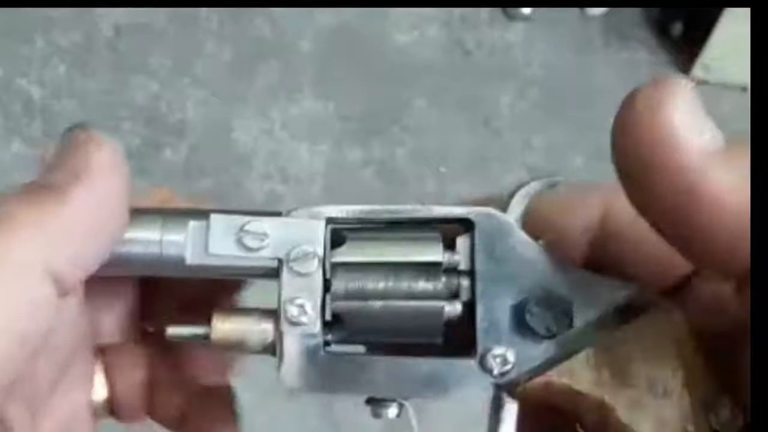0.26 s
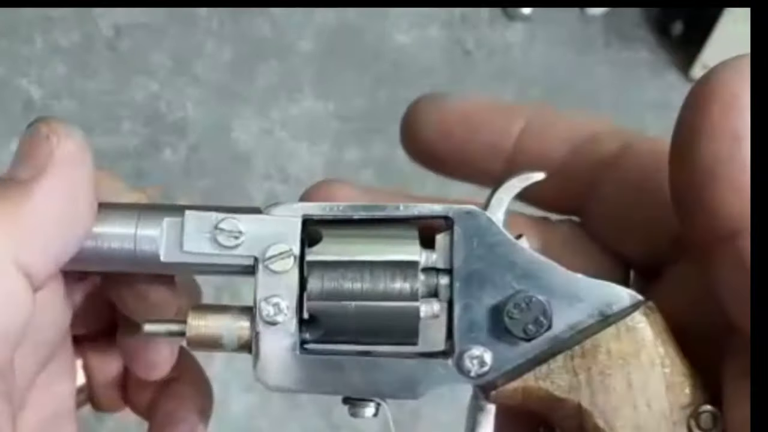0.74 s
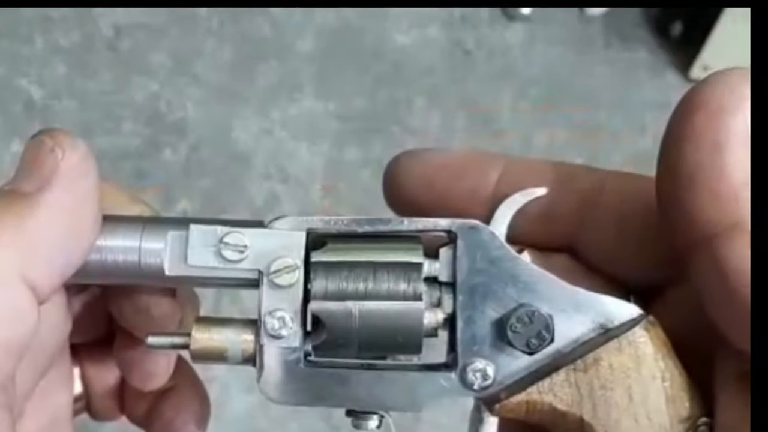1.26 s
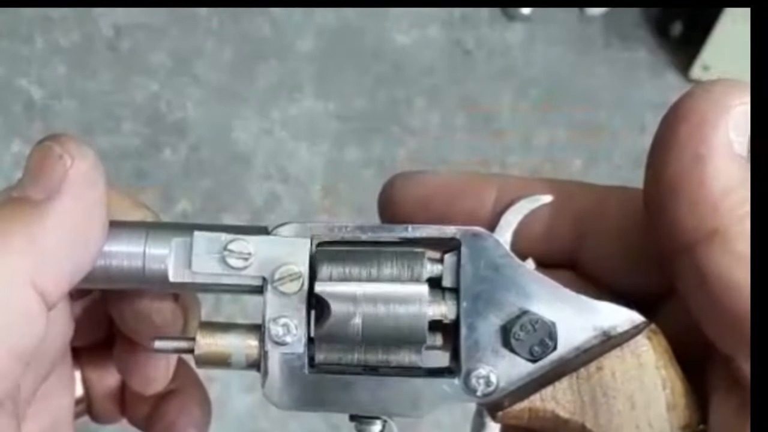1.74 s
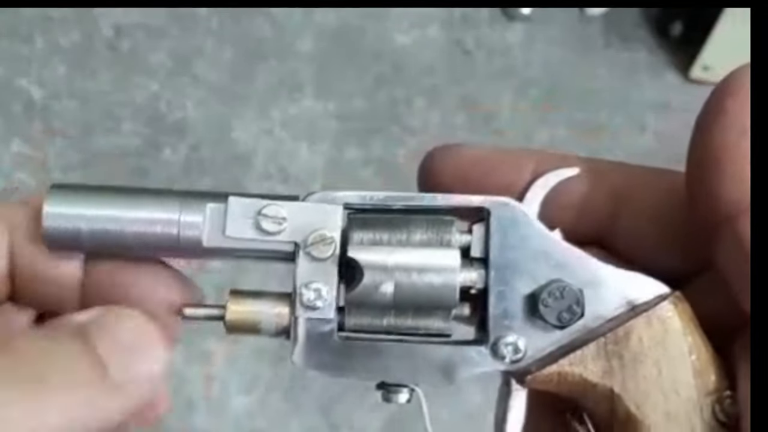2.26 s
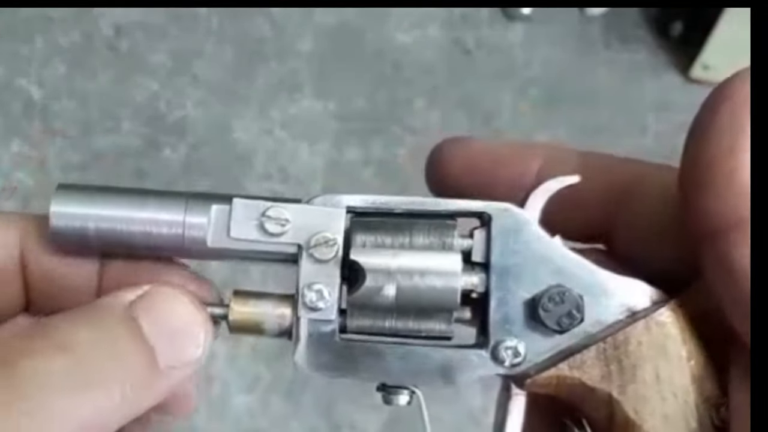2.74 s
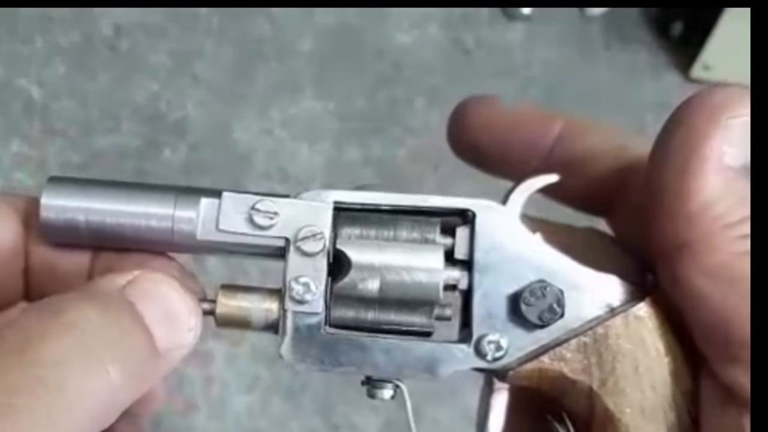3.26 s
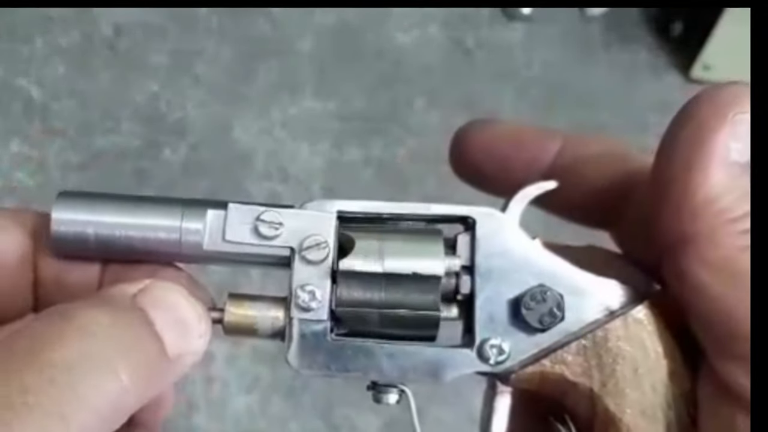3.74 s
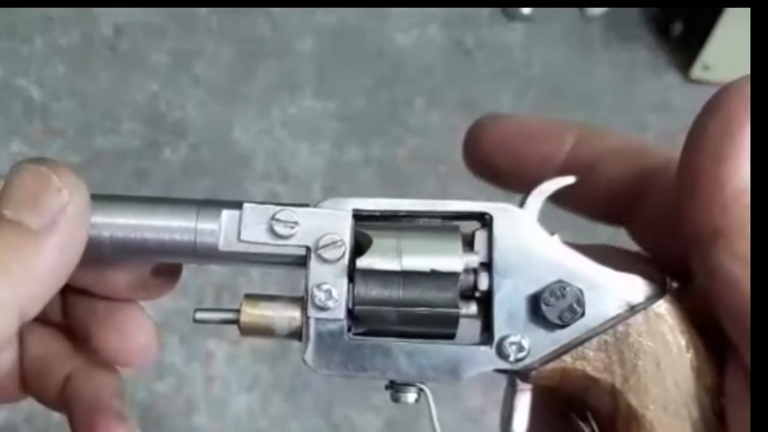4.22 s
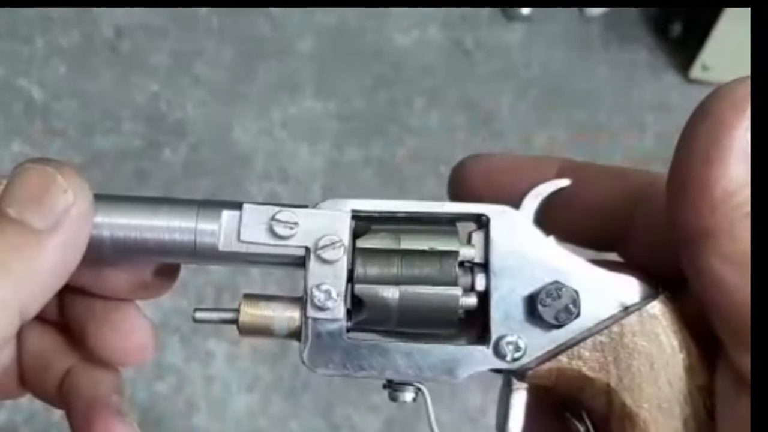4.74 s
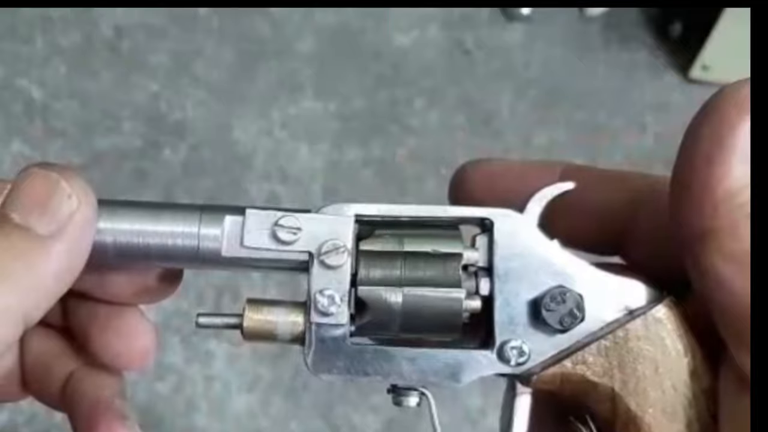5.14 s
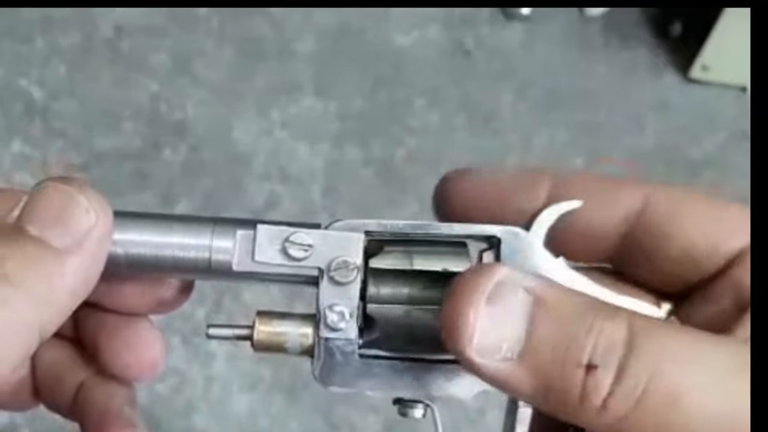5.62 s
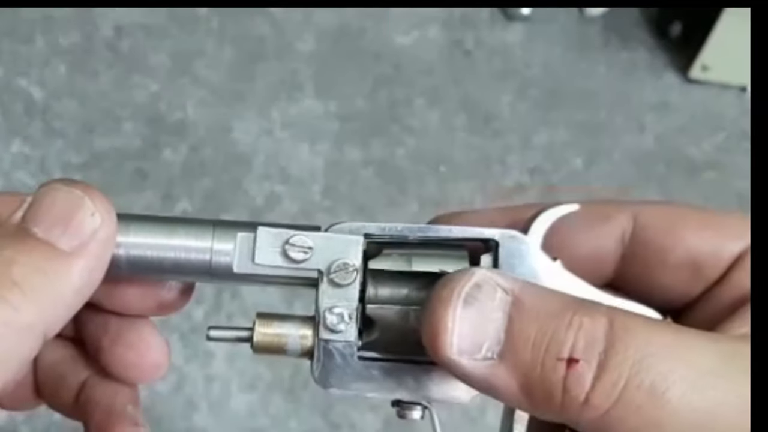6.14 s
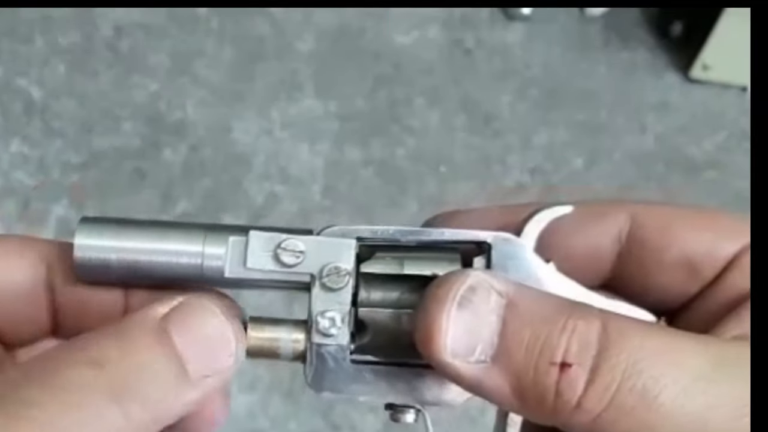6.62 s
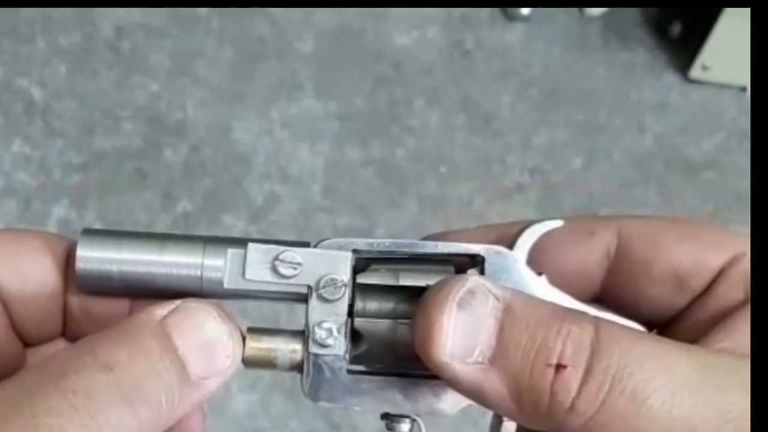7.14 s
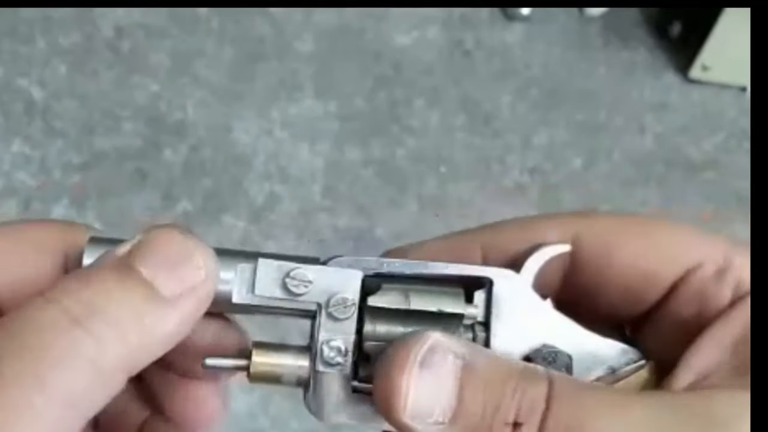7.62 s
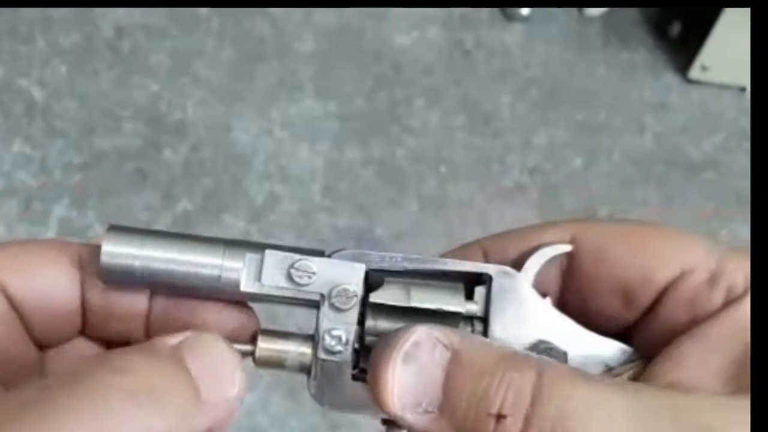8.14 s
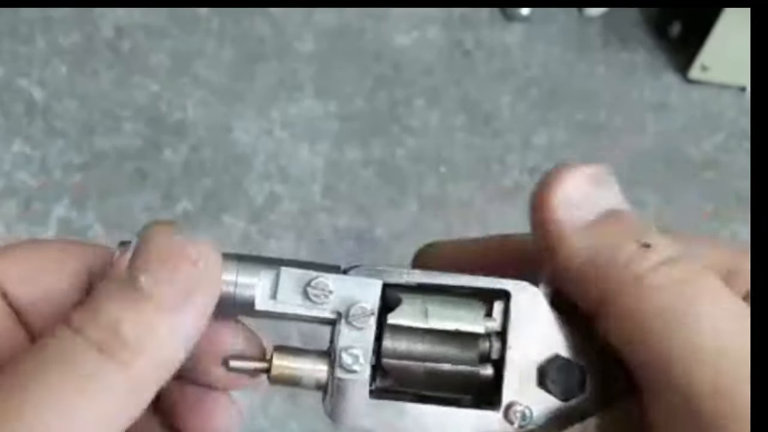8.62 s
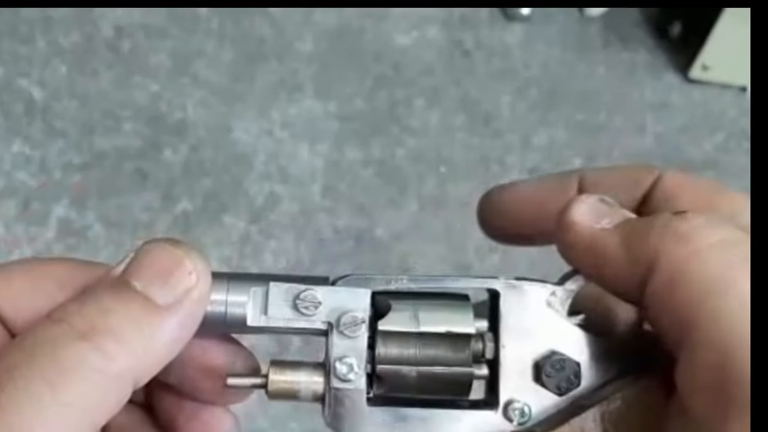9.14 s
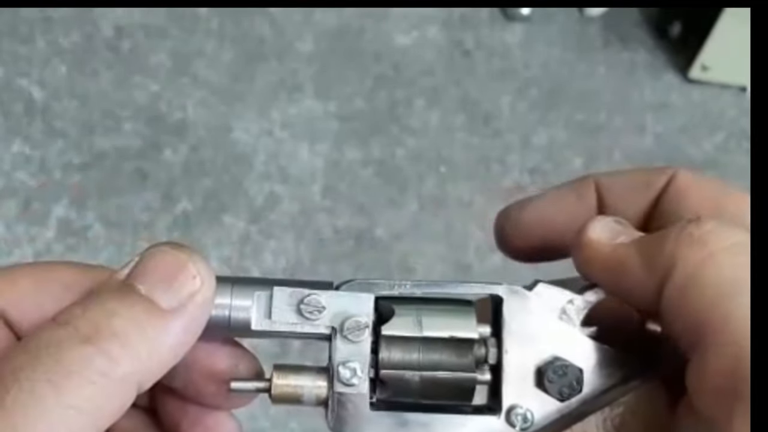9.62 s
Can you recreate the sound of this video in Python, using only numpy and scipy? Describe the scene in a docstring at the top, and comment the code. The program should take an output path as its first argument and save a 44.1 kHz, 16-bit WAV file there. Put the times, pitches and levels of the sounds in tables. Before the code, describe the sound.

Close stereo pickup of a small metal revolver handled in a dry little room with faint low hum. Fingers rub softly, the cylinder whirs briefly and is caught by a loud bright snap. Scattered clinks and ticks follow, with two hard clacks of the pin well apart, then a denser rattle of handling, and at the end a sharp hammer click.

```python
"""Small revolver worked by hand

A small steel revolver is handled close to a stereo microphone in a dead little workroom that hums faintly.
Its freed cylinder whirs and is caught with a snap, its pin clacks twice, and at last the hammer clicks back.
Uneven impacts excite clinks, knocks and ticks; damped modes ring in the snaps; filtered noise makes
the rubs, creaks, squeaks, ringing bodies, whir and hum; a wavering sine sings at the pivot.
Short reflections surround the impacts.
"""
import sys
import numpy as np
from scipy import signal
from scipy.fft import rfft, irfft, next_fast_len
from scipy.io import wavfile
from scipy.ndimage import uniform_filter1d

SR = 44100
rng = np.random.default_rng(int(sys.argv[2]) if len(sys.argv) > 2 else 0)


def generate_wav(sig):
    """Save sig (samples, or channels by samples) to the path in sys.argv[1] as 16-bit PCM at SR."""
    pcm = np.round(np.clip(np.atleast_2d(sig).T, -1, 1) * 32767).astype(np.int16)
    wavfile.write(sys.argv[1], SR, pcm)


N = 435708
SIZE = 32768   # samples in one short sound
AGE = np.arange(SIZE) / SR   # seconds into a short sound
HZ = np.maximum(np.arange(SIZE // 2 + 1) * SR / SIZE, 1)
LEFT_LEAD_S = 0.0002215   # sound reaches the left port this much earlier


def from_db(db):
    """Decibels to gain."""
    return 10 ** (np.asarray(db) / 20)


def rms_one(x):
    """Scale to unit power."""
    return x / np.sqrt(np.mean(x ** 2) + 1e-20)


def energy_one(x):
    """Scale one short sound to unit energy a channel."""
    return rms_one(x) / np.sqrt(SIZE / SR)


def in_time(points):
    """Read a (time, level) curve at every sample."""
    s, level = np.transpose(points)
    return np.interp(np.arange(N) / SR, s, level)


def at_hz(points, hz):
    """Read a spectrum on a log-frequency axis."""
    f, value = np.transpose(points)
    return np.interp(np.log(hz), np.log(f), value)


def peak_db(hz, centre_hz, width_hz):
    """A steep-sided resonance, 3.5 dB down about half a width either side of its centre."""
    detuning = (hz ** 2 - centre_hz ** 2) / (hz * width_hz * np.sqrt(2))
    return -20 * np.log10(1 + detuning ** 2)


def colour(x, db):
    """Causal (minimum-phase) filter with the given gain at HZ, for short sounds."""
    cepstrum = irfft(np.log(from_db(db)))
    # fold the cepstrum onto positive time, which makes the phase minimum
    cepstrum[1:SIZE // 2] *= 2
    cepstrum[SIZE // 2 + 1:] = 0
    return irfft(rfft(x) * np.exp(rfft(cepstrum)))


def add(out, s, sound):
    """Mix a short sound in at time s."""
    start = round(s * SR)
    out[:, start:start + SIZE] += sound[:, :N - start]


def envelope(start_s, attack_s, hold_s, release_s):
    """Rise linearly to full strength at start_s, hold, then die away exponentially."""
    age = np.arange(N) / SR - start_s
    rise = np.clip(1 + age / attack_s, 0, 1)
    return rise * np.exp(-np.maximum(age - hold_s, 0) / release_s)


def diffuse(shape_db, size):
    """Stereo noise from all around: most alike in the low range, unrelated at the top; the left leads."""
    # how alike left and right are: hz, likeness (0-1)
    likeness = [(60, 0.17), (130, 0.95), (290, 0.52), (640, 0.82), (1400, 0.14), (15000, 0)]
    length = next_fast_len(size, real=True)
    hz = np.maximum(np.arange(length // 2 + 1) * SR / length, 1)
    alike = np.clip(at_hz(likeness, hz), -1, 1)
    noise = rfft(rng.standard_normal((2, length))) * from_db(shape_db(hz))
    mid, side = noise * np.sqrt([1 + alike, 1 - alike])
    left = mid + side
    right = (mid - side) * np.exp(-2j * np.pi * hz * LEFT_LEAD_S)
    return rms_one(irfft(np.array([left, right]), length)[:, :size])


def room(build_s=.008, floor_s=.0105, floor_db=4.0):
    """Reflections: first from the hands, then more from the floor, each band dying at its own rate."""
    # decay time of the reflections: hz, t60_s
    decay = [(200, 0.32), (1000, 0.19), (4000, 0.21), (8000, 0.19), (14000, 0.17)]
    noise = rfft(diffuse(np.zeros_like, size=SIZE))
    centres = np.log(np.array(decay)[:, 0])
    tail = 0
    for (hz, t60_s), own in zip(decay, np.eye(len(decay))):
        band = np.interp(np.log(HZ), centres, own)   # crossfades into its neighbours
        tail = tail + irfft(noise * band) * from_db(-60 * AGE / t60_s)
    build = 1 - np.exp(-AGE / build_s * np.pi)
    floor = from_db(floor_db * (AGE > floor_s))
    return energy_one(tail * build * floor) / np.sqrt(SR)


def heard(sound, reflections, direct_db, room_db):
    """The straight path reaches the left port first; the reflections come from everywhere."""
    # what the left port adds to sound from straight ahead: hz, gain_db
    on_axis = [(3000, 0), (5000, 1), (7000, 2.5), (9000, 6), (12000, 4), (15000, 1)]
    left = colour(sound, at_hz(on_axis, HZ))
    right = np.interp(AGE - LEFT_LEAD_S, AGE, sound, left=0)
    reflected = irfft(rfft(sound) * rfft(reflections))
    return from_db(direct_db) * np.array([left, right]) + from_db(room_db) * reflected


def chatter(slide_s, per_s=2500, uneven_db=8.5):
    """A run of tiny uneven impacts that dies away."""
    sizes = rng.standard_normal(SIZE) * from_db(uneven_db * rng.standard_normal(SIZE))
    touches = sizes * (rng.random(SIZE) < per_s / SR)
    return energy_one(touches * np.exp(-AGE / slide_s))


def friction(spectrum, level_db, grain_db, grain_s=0.0051):
    """Sliding noise, roughened by the grain of the surfaces."""
    grain = rms_one(uniform_filter1d(rng.standard_normal(N), int(grain_s * SR)))
    noise = diffuse(lambda hz: at_hz(spectrum, hz), size=N)
    return from_db(level_db) * rms_one(noise * from_db(grain_db * grain))


def hum():
    """Two narrow bands of low noise waver like tones of the room over an even hiss."""
    # the drone swells and sinks slowly: time_s, level_db
    drone_level = [(0, -54.5), (.6, -59), (1.2, -53), (1.6, -59.5), (2.6, -56.5), (3.55, -62.5),
                   (3.9, -54.5), (4.3, -60), (5.05, -53.5), (5.2, -48.5), (5.4, -52.5), (6.8, -60.5),
                   (9.4, -66.5), (9.88, -57)]
    # spectrum of the hiss: hz, relative_db
    air = [(15, -37), (25, -14.5), (89, -3.5), (184, -0.5), (307, -12), (371, -15), (449, -8.5), (542, -19),
           (905, -16), (1680, -21), (5520, -25), (10800, -27.5), (14600, -25), (15800, -25.5)]
    drone = diffuse(lambda hz: peak_db(hz, 193.6, width_hz=6.9), size=N)
    rumble = diffuse(lambda hz: peak_db(hz, 86.5, width_hz=20), size=N)
    hiss = diffuse(lambda hz: at_hz(air, hz), size=N)
    return from_db(in_time(drone_level)) * drone + from_db(-64) * rumble + from_db(-52.5) * hiss


def rub(trim_db=-1.0):
    """Fingers rub on the gun: grainy noise that swells and sinks with the handling."""
    # strength of the rubbing: time_s, level_db (before the trim)
    strength = [(0.0, -62.5), (0.85, -65), (1.32, -60.5), (1.73, -54.5), (1.95, -56), (2.26, -60),
                (2.67, -66), (2.97, -63), (3.11, -54), (3.36, -61), (5.47, -64), (5.86, -65), (6.52, -63.5),
                (7.29, -62), (7.43, -57.5), (9.0, -61), (9.88, -59.5)]
    # spectrum of skin on steel: hz, relative_db
    skin = [(150, -19), (450, -4), (950, 0), (1600, -2), (3000, -6.5), (6000, -11.5), (9000, -15.5),
            (12000, -25)]
    return friction(skin, in_time(strength) + trim_db, grain_db=1.5)


def bumps(centre_hz=85, width_hz=22):
    """Each shift of the grip gives a short low boom of narrow-band noise."""
    # shifts of the grip: start_s (full strength), level_db
    shifts = [(.03, -47), (1.15, -49), (1.58, -51.5), (1.95, -47), (4.0, -53.5), (6.95, -58), (7.45, -65),
              (7.87, -47.5), (8.32, -49)]
    strength = 0
    for s, db in shifts:
        strength = strength + from_db(db) * envelope(s, attack_s=0.028, hold_s=0.02, release_s=0.17)
    return strength * diffuse(lambda hz: peak_db(hz, centre_hz, width_hz), size=N)


def resonant_swells(rooms):
    """Short swells of noise in one resonance: creaks, squeaks, and the ringing body of clacks and knocks."""
    # swells: start_s, length_s, energy_db, pitch_hz, width_hz
    swells = [(.805, 0.013, -67.5, 1190, 350), (1.11, 0.052, -62, 980, 70),
              (1.338, 0.02, -52.5, 5300, 1900), (1.6, 0.19, -63.5, 7400, 450),
              (2.17, 0.063, -64.5, 3240, 600), (2.31, 0.054, -65.5, 370, 200), (2.57, 0.045, -67, 308, 150),
              (3.07, 0.061, -63, 1260, 304), (3.153, 0.031, -49, 3750, 800), (3.645, 0.03, -63, 590, 403),
              (3.72, 0.011, -59.5, 1900, 500), (4.742, 0.03, -65, 726, 200),
              (4.895, 0.013, -66.5, 5800, 600), (5.146, 0.026, -54.5, 500, 189),
              (6.946, 0.023, -43.5, 4500, 1290), (6.947, .012, -58, 1320, 400),
              (7.25, 0.033, -59, 6400, 1600), (7.59, 0.034, -55, 4660, 1000),
              (7.722, 0.013, -60.5, 1080, 330), (7.86, 0.02, -62, 585, 250), (8.02, 0.021, -69, 785, 200),
              (8.175, 0.049, -50, 5800, 337), (8.75, 0.033, -67, 4540, 700), (9.17, 0.064, -75, 9000, 700)]
    out = np.zeros((2, N))
    for k, (s, length_s, db, hz, width_hz) in enumerate(swells):
        swell = np.sin(np.pi * np.minimum(AGE / length_s, 1))
        resonance_db = np.maximum(peak_db(HZ, hz, width_hz), -60)
        sound = colour(rng.standard_normal(SIZE) * swell, resonance_db)
        placed = heard(sound, rooms[k % len(rooms)], direct_db=0.5, room_db=1.5)
        add(out, s, from_db(db) * energy_one(placed))
    return out


def contacts(rooms, strike_s=0.0098, first_s=0.001):
    """Parts strike, weaker the longer they slide, then chatter: steel clinks and the frame knocks."""
    # loose parts meet: start_s, slide_s, clink_db, brightest_hz (of the clink), knock_db
    meetings = [(.8585, .002, -58, 10500, -74), (1.3378, 0.0062, -42.5, 11400, -62),
                (1.44, 0.0092, -71, 8000, -52.5), (2.14, 0.06, -55, 9000, -57.5),
                (2.259, 0.0091, -53.5, 7400, -59), (2.51, .033, -78, 7000, -56.5),
                (2.93, 0.017, -63, 7000, -51), (3.1512, 0.014, -33, 8200, -31),
                (3.4546, .005, -59, 9100, -60.5), (3.718, 0.0048, -48, 8350, -64),
                (3.8044, .006, -56, 9200, -56), (4.2459, .009, -52, 8500, -60.5),
                (4.416, 0.0057, -56, 7400, -67), (4.7442, 0.0045, -47, 7500, -62),
                (4.9009, 0.0055, -59, 7800, -68), (5.1905, .014, -42.5, 6800, -68),
                (5.76, .01, -57.5, 6000, -63), (5.9141, 0.017, -47, 11300, -63),
                (6.5102, 0.025, -53, 11500, -70), (6.8674, 0.04, -52, 7200, -62),
                (6.9458, 0.0041, -30, 7660, -68.5), (7.2455, 0.025, -52, 8000, -66),
                (7.3583, 0.025, -51.5, 8000, -61.5), (7.4895, 0.0039, -56.5, 8400, -62),
                (7.5927, 0.015, -49.5, 8050, -59), (7.86, 0.0094, -51, 7660, -46.5),
                (8.312, 0.0074, -45, 7300, -52.5), (8.4887, 0.12, -52, 8650, -63),
                (8.565, 0.0035, -53, 10000, -61), (8.6813, 0.016, -56, 8500, -66),
                (8.745, .039, -51, 9100, -79), (8.897, 0.032, -50.5, 8500, -70)]
    # resonances of the frame, heard in every contact: centre_hz, width_hz, boost_db
    frame = [(903, 300, 11.5), (1390, 190, 6.5), (2080, 230, 0), (2660, 250, -1), (3520, 160, -1.5),
             (4780, 590, 1.5), (7690, 250, 2.5)]
    # the clink slides as one shape with the hardness of the contact: multiple_of_brightest_hz, relative_db
    clink_shape = [(.12, -26), (.24, -15), (.34, -6.5), (.58, -4), (.8, -2.5), (1, -3), (1.2, -9.5),
                   (1.6, -18), (2.2, -27)]
    # the knock of the frame, damped by the hands: hz, relative_db
    knock_shape = [(40, -38), (160, 2), (230, -8.5), (320, -6), (500, -13.5), (780, -7), (2000, -2),
                   (4700, -20), (13000, -55)]
    frame_db = sum(db * np.exp(-((HZ - hz) / width) ** 2) for hz, width, db in frame)
    out = np.zeros((2, N))
    for k, (s, slide_s, clink_db, bright_hz, knock_db) in enumerate(meetings):
        strike = strike_s / slide_s * chatter(first_s, per_s=22000)
        force = energy_one(chatter(slide_s) + strike)
        clink = colour(force, clink_db + at_hz(clink_shape, HZ / bright_hz) + frame_db)
        knock = colour(force, knock_db + at_hz(knock_shape, HZ) + frame_db)
        # the shielding hands weaken the straight path
        add(out, s, heard(clink, rooms[k % len(rooms)], direct_db=-16.0, room_db=-4.0))
        add(out, s, heard(knock, rooms[(k + 1) % len(rooms)], direct_db=-6.5, room_db=0.5))
    return out


def ticks(rooms, width_hz=1300):
    """The pawl touches its ratchet: very short bursts in one resonance, nearly dry."""
    # touches of the pawl: start_s, energy_db (before placing), pitch_hz
    touches = [(.8585, -70, 5760), (1.4397, -65, 5460), (2.5966, -71.5, 5370), (2.7792, -73, 4100),
               (3.5943, -73.5, 5530), (4.2459, -87, 7450), (4.2668, -75, 6760), (6.6369, -70, 5200),
               (6.8055, -75, 5030), (6.8674, -69, 5960), (7.2455, -65, 4900), (7.3583, -70, 6900),
               (7.5925, -63, 4600), (7.6776, -65.5, 4580), (8.7227, -70.5, 7550), (9.4745, -76, 6500)]
    out = np.zeros((2, N))
    for k, (s, db, hz) in enumerate(touches):
        burst = chatter(0.0021, per_s=7300)
        sound = energy_one(colour(burst, peak_db(HZ, hz, width_hz)))
        add(out, s, from_db(db) * heard(sound, rooms[k % len(rooms)], direct_db=-1.5, room_db=-7.5))
    return out


def spin(start_s=1.366, hold_s=0.46, start_db=-55, swell_db_per_s=18.5):
    """The freed cylinder whirs on its pin, growing louder, and fades after it is caught."""
    # spectrum of the whir: hz, relative_db
    whir = [(300, -16), (1000, 7.5), (2100, -6), (2900, 3.5), (3600, 5), (4400, -1), (5100, 2.5),
            (6600, -5), (7400, 2), (7850, 5), (8400, -2), (9300, -6), (11000, -23), (16000, -17)]
    swell_db = swell_db_per_s * np.clip(np.arange(N) / SR - start_s, 0, hold_s)
    noise = friction(whir, start_db + swell_db, grain_db=-2.5)
    return noise * envelope(start_s, attack_s=0.036, hold_s=hold_s, release_s=0.091)


def snap(s, level_db, modes, reflections, direct_db, room_db, crack_db, crack_hz):
    """A spring drives a catch home: damped modes start in turn up and down, under a like-coloured crack."""
    ring = 0
    for k, (hz, db, t60_s) in enumerate(modes):
        strength = (-1) ** k * from_db(db + rng.standard_normal())
        ring = ring + strength * from_db(-60 * AGE / t60_s) * np.sin(2 * np.pi * hz * AGE)
    bass_cut_db = np.maximum(-10 * np.log10(1 + (crack_hz / HZ) ** 10), -14)
    crack_colour_db = at_hz(np.array(modes)[:, :2], HZ) + bass_cut_db
    crack = colour(chatter(.002, per_s=20000), crack_colour_db)
    sound = ring + from_db(crack_db) * crack
    out = np.zeros((2, N))
    add(out, s, from_db(level_db) * heard(sound, reflections, direct_db, room_db))
    return out


def cylinder_stop(reflections):
    """The stop catches the spinning cylinder and its steel rings for a few milliseconds."""
    # modes of the stop: pitch_hz, relative_db (varied by chance), t60_s
    stop_modes = [(230, -26, .008), (750, -26, .007), (2850, -26, .016), (3560, -20, .018),
                  (3920, -19, .018), (4800, -17, .016), (5300, -14.5, .016), (5850, -14.5, .016),
                  (6650, -18, .018), (7400, -18, .015), (8700, -16, .016), (9050, -21, .016),
                  (10700, -21, .012), (11750, -17, .014), (13100, -22, .011), (15400, -20, .012)]
    return snap(1.7258, -1, stop_modes, reflections,
                direct_db=-.5, room_db=-5.5, crack_db=-18, crack_hz=2900)


def sing(pitch_hz=2194, waver_hz=16.2, level_db=-64, waver_s=0.0063, rough_db=3.0):
    """The hammer's pivot sings as the thumb draws it back: a stick-slip tone, unsteady in pitch and strength."""
    waver, rough = (rms_one(uniform_filter1d(rng.standard_normal(N), int(waver_s * SR))) for _ in range(2))
    phase = 2 * np.pi * np.cumsum(pitch_hz + waver_hz * waver) / SR
    tone = rms_one(np.sin(phase) * from_db(rough_db * rough))
    return from_db(level_db) * tone * envelope(9.32, attack_s=0.33, hold_s=.07, release_s=0.32)


def hammer(reflections):
    """The hammer clicks back into its catch and its steel rings for a few milliseconds."""
    # modes of the hammer: pitch_hz, relative_db (varied by chance), t60_s
    hammer_modes = [(4360, -25.5, .016), (4950, -24, .014), (5450, -23.5, .014), (5900, -27, .016),
                    (6560, -14, .021), (7100, -24, .014), (7650, -20, .016), (8400, -33, .012),
                    (9080, -26, .018), (9480, -20, .02), (10700, -33, .012), (12700, -31, .013),
                    (13700, -31, .012), (15400, -29, .013)]
    return snap(9.8126, -0.5, hammer_modes, reflections,
                direct_db=0, room_db=-7.5, crack_db=-19.5, crack_hz=4800)


def ports(x):
    """Each microphone port has its own treble resonance."""
    # colour of each port: hz, gain_db
    left_port = [(1200, -2), (5000, 0.5), (7000, 2), (8800, 6), (9500, 4.5), (10500, -2.5), (12500, 4.5),
                 (15500, 0)]
    right_port = [(1200, -0.5), (5000, -0.5), (7000, -1.5), (8800, -16), (9500, 0), (10300, -61),
                  (12500, 2.5), (15500, 1)]
    impulse = 1. * (AGE == 0)
    responses = np.array([colour(impulse, at_hz(port, HZ)) for port in (left_port, right_port)])
    return signal.oaconvolve(x, responses, axes=1)[:, :N]


def scene(count=8):
    """The gun moves in the hands, so its reflections change from one sound to the next."""
    rooms = [room() for _ in range(count)]
    gun = rub() + bumps()
    gun += resonant_swells(rooms) + contacts(rooms) + ticks(rooms)
    gun += spin() + cylinder_stop(rooms[0])
    gun += sing() + hammer(rooms[1])
    return ports(gun) + hum()


def record(dry):
    """Full scale limits the peaks; a steep low-pass cuts the top."""
    low_pass = signal.ellip(10, .1, 80, 15900, fs=SR, output="sos")   # cutoff in Hz
    return signal.sosfilt(low_pass, np.clip(dry, -1, 1))


dry = scene()
out = record(dry)
generate_wav(out)
```